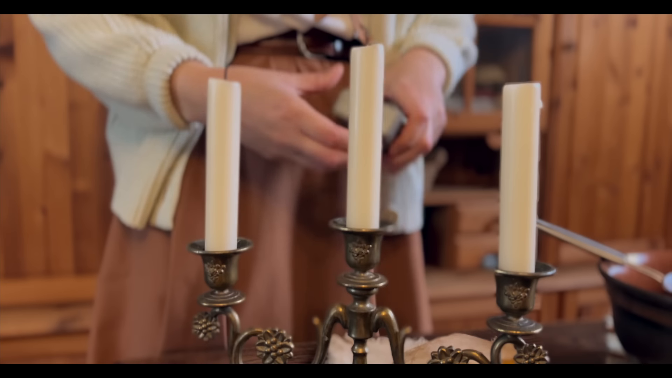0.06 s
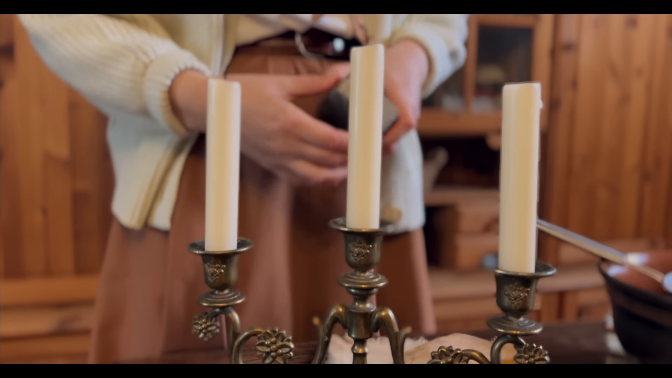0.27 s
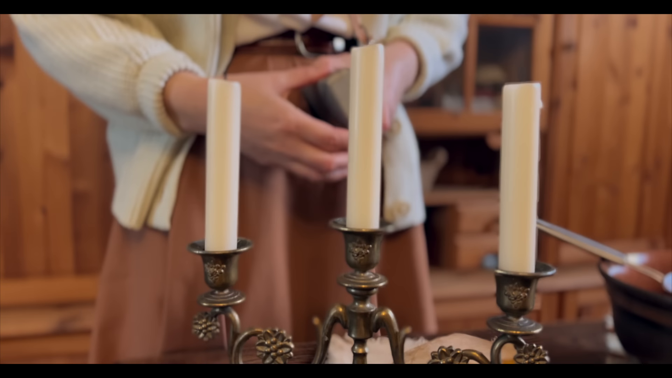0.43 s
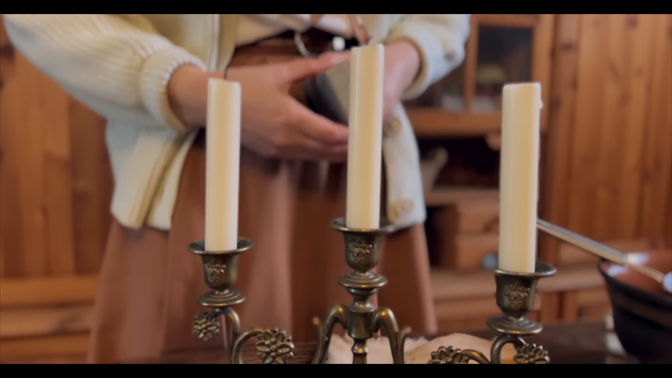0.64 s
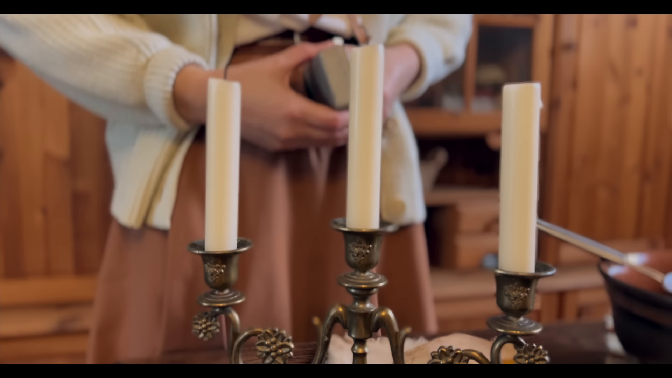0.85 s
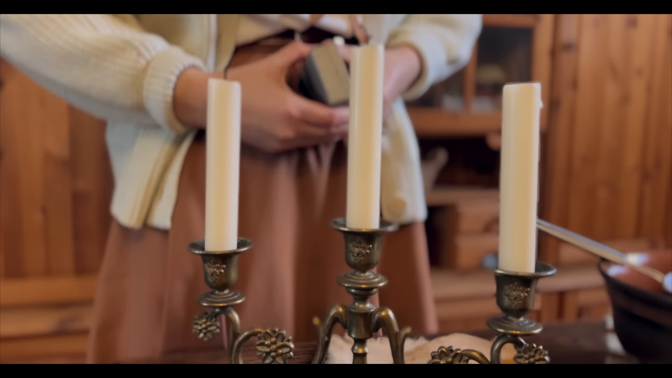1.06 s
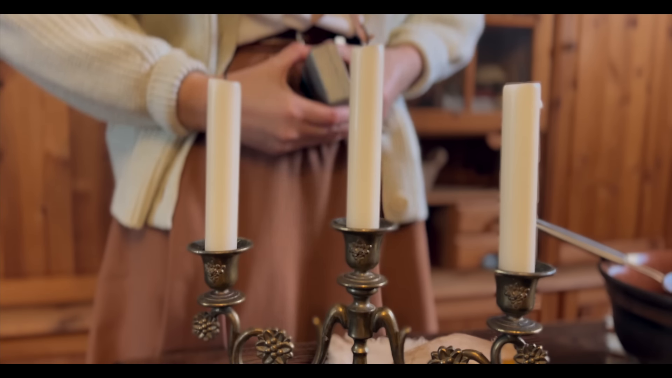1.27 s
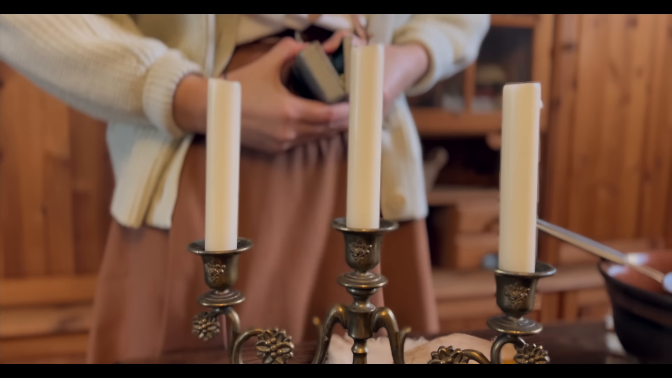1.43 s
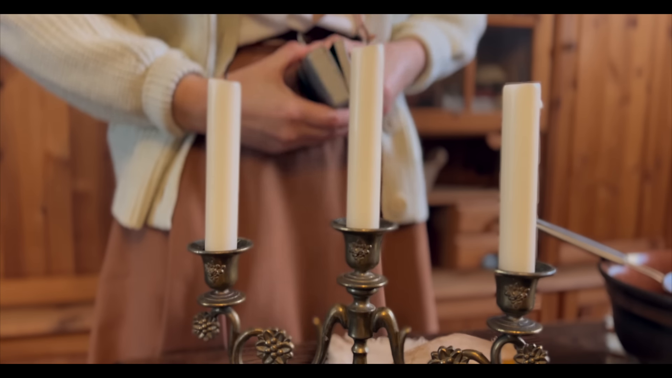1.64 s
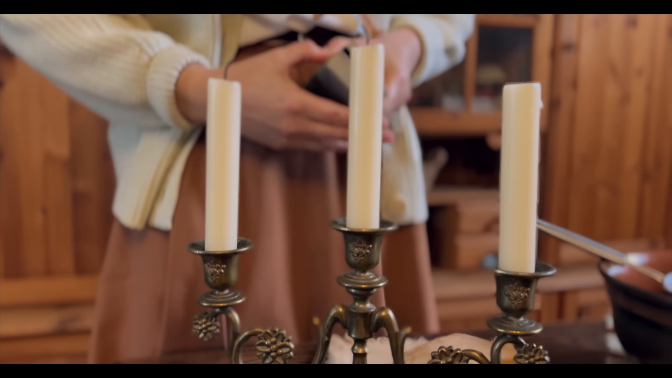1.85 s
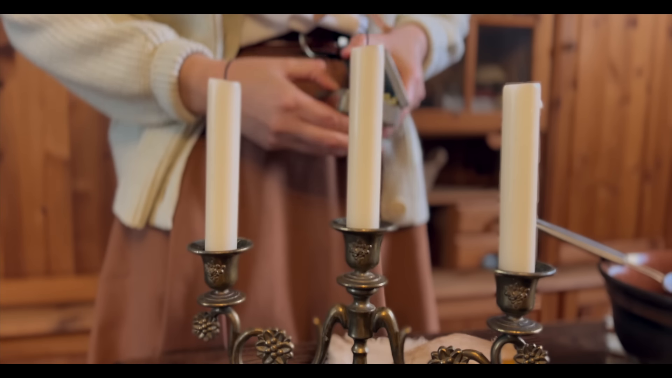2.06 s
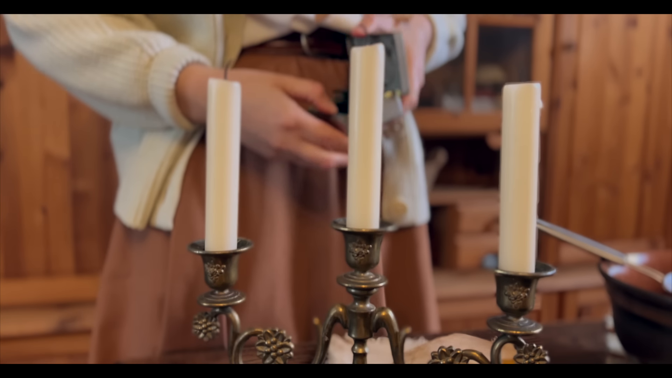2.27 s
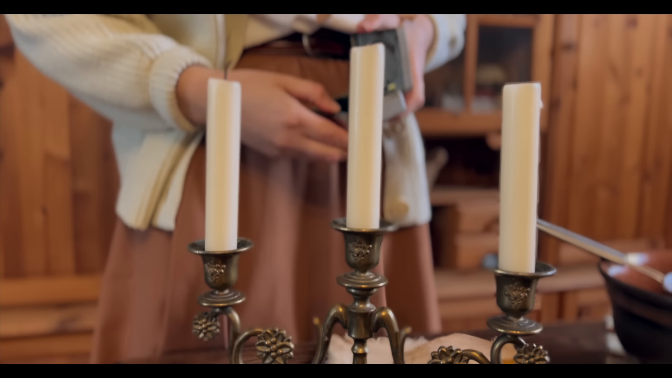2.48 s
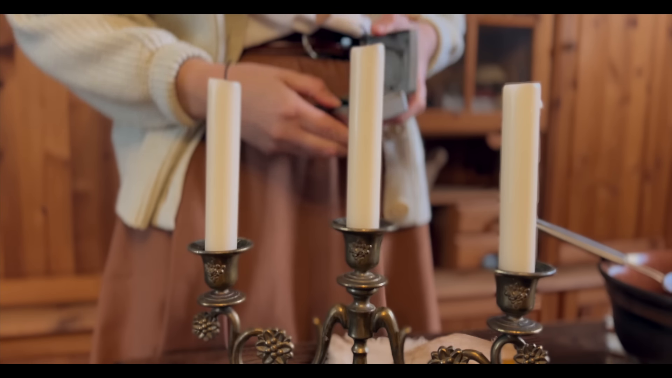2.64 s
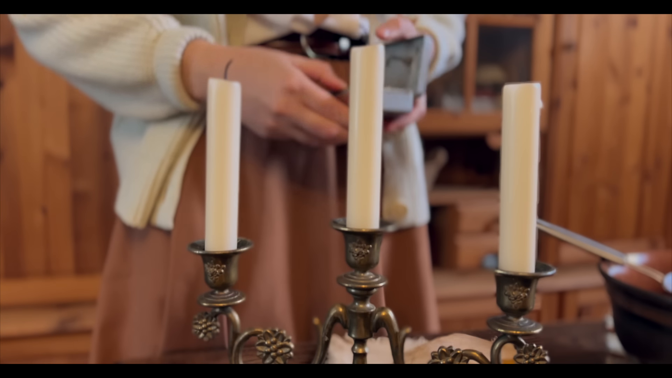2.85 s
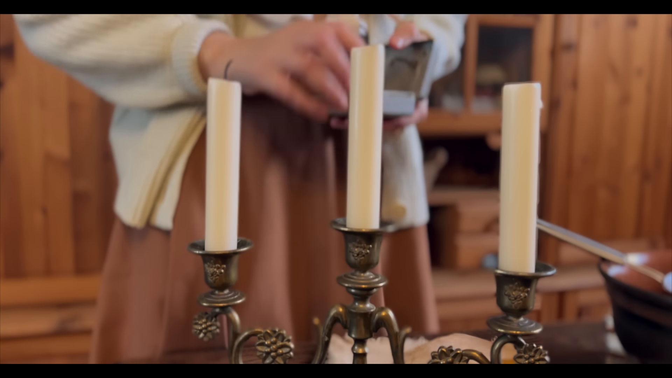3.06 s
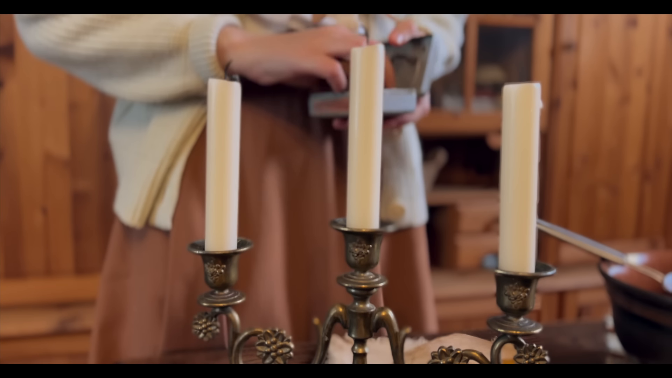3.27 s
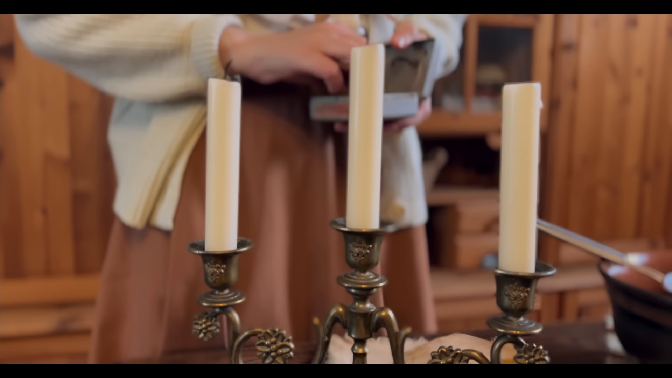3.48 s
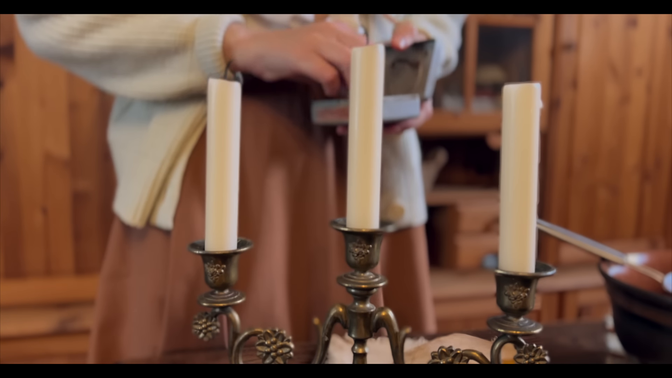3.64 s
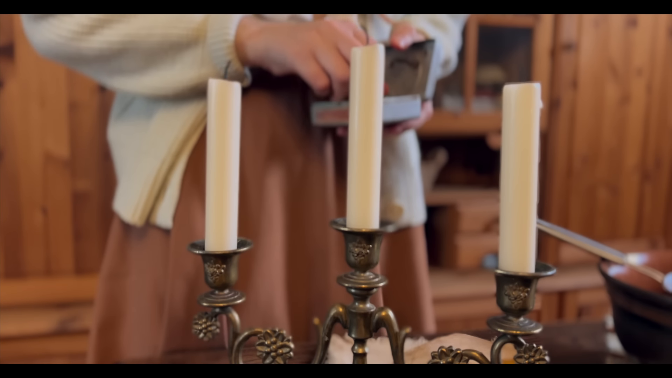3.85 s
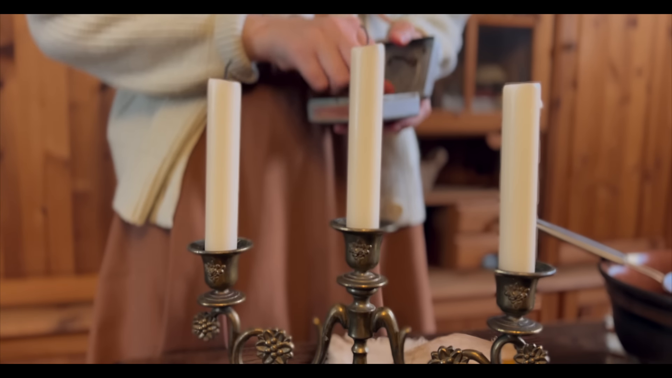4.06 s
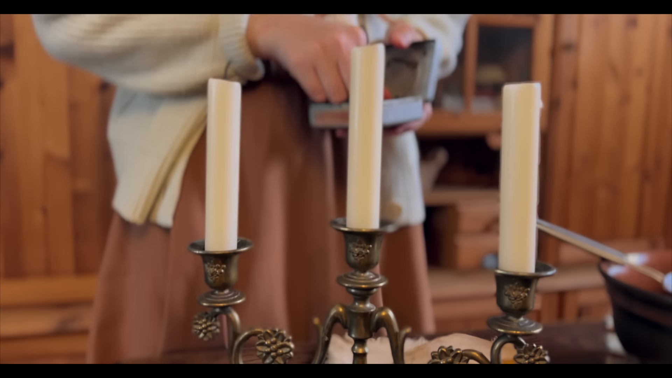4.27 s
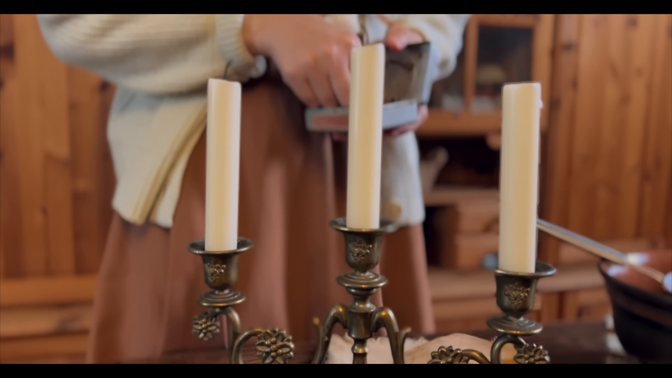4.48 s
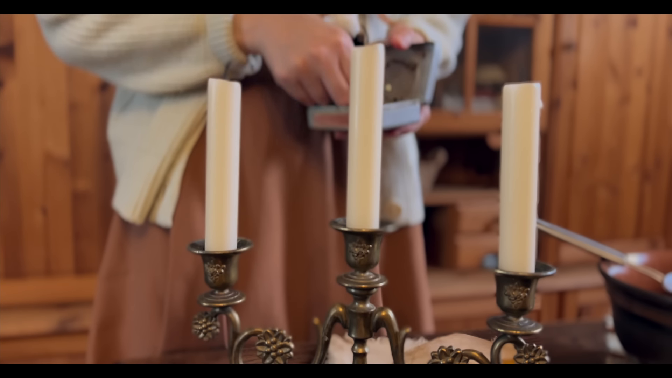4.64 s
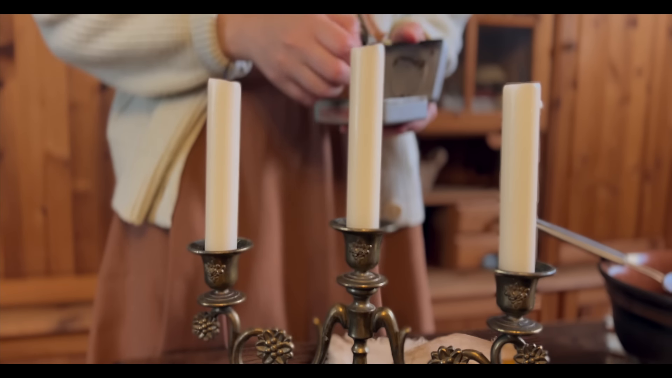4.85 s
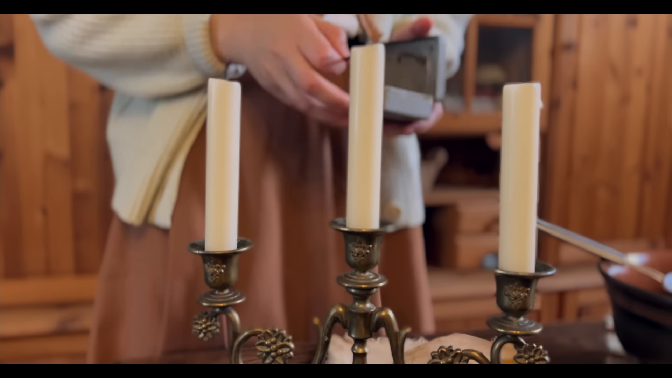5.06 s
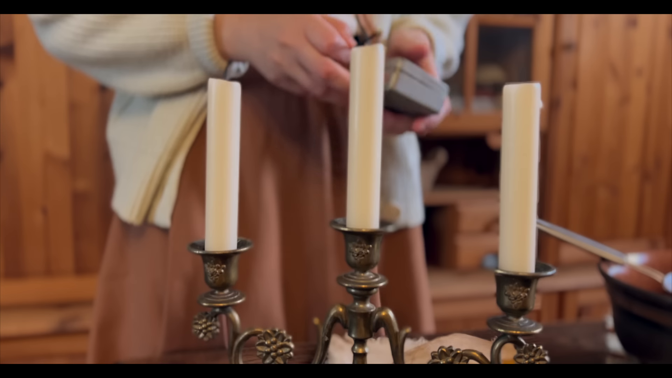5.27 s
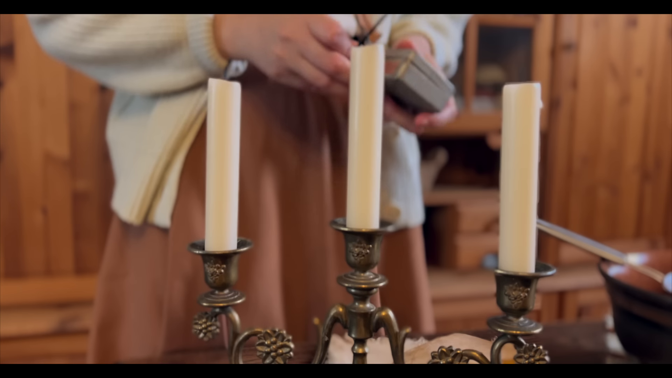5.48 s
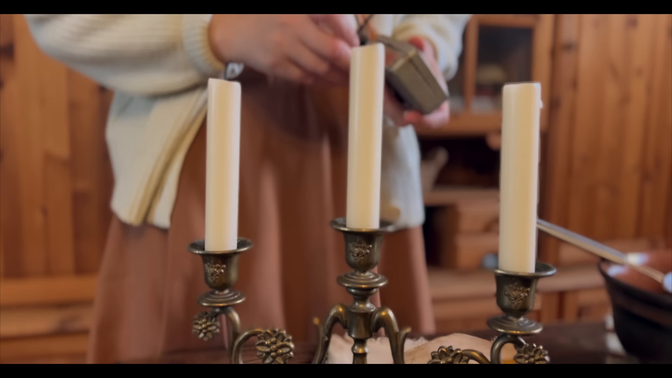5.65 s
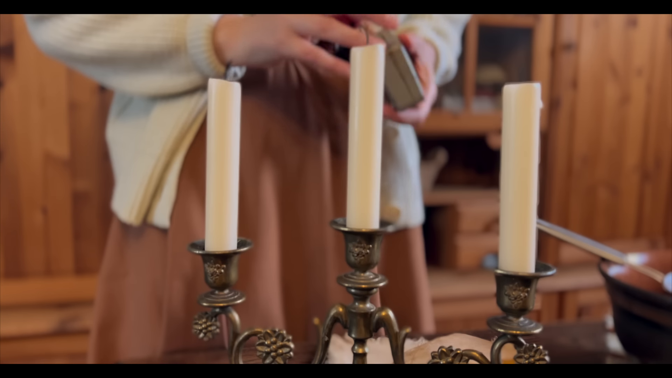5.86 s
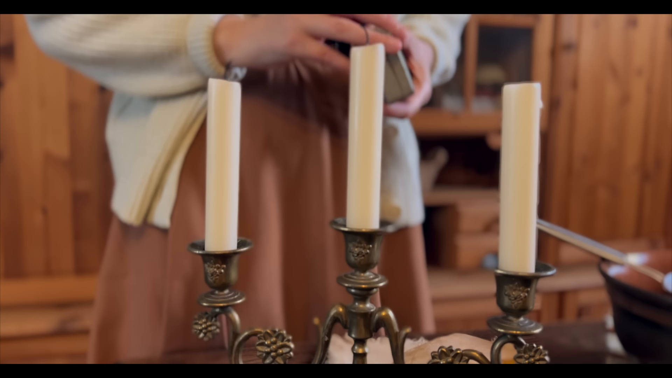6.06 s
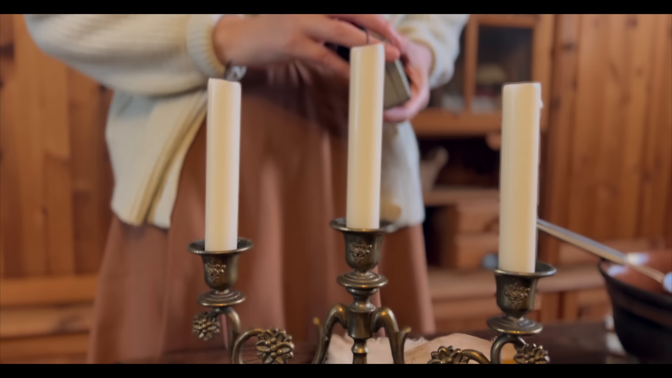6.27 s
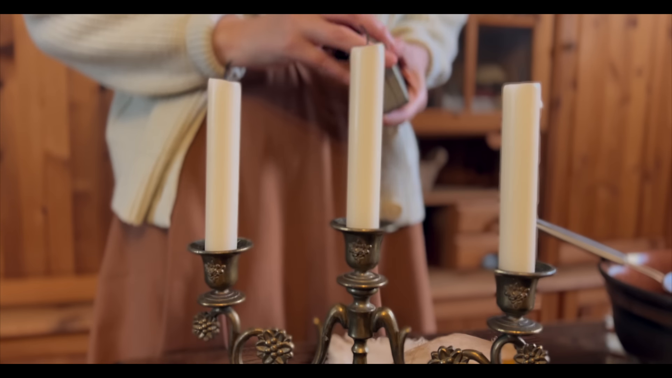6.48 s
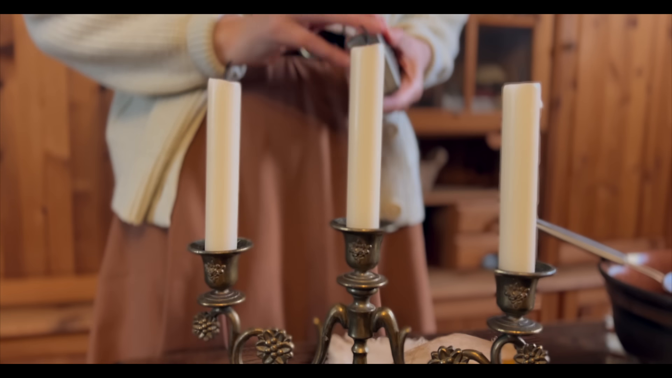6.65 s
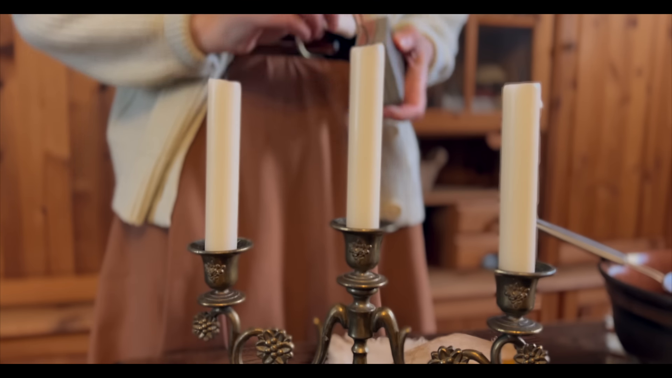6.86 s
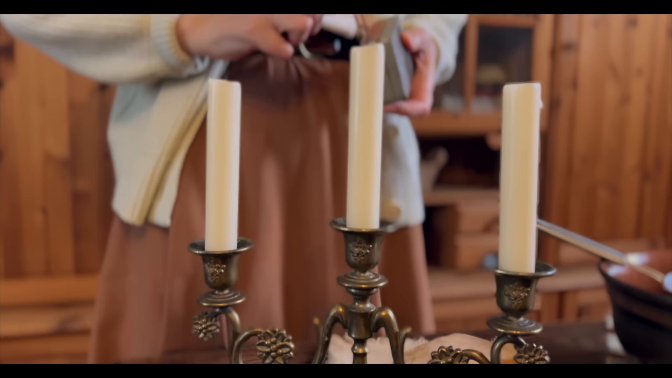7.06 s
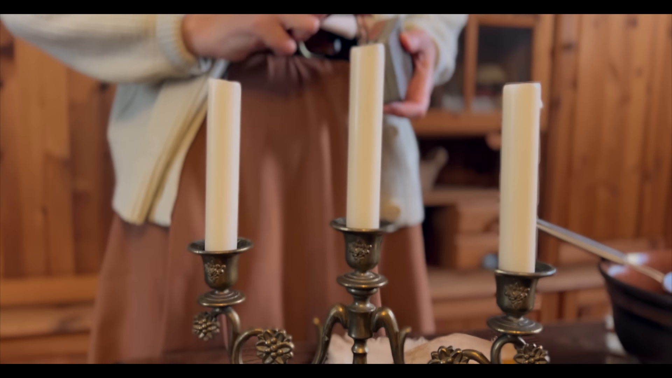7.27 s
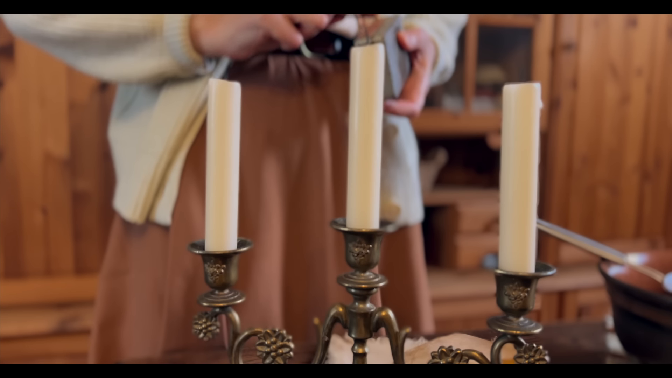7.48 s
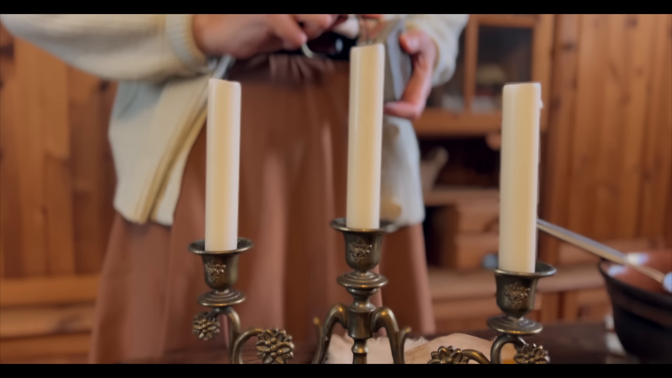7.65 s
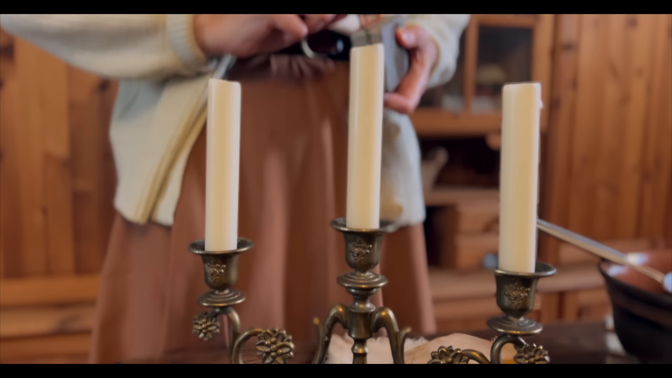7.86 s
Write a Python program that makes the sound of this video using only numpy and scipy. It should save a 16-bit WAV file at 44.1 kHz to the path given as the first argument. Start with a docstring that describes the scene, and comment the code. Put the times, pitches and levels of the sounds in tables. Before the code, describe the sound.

In a quiet room with a faint low hum, a large cardboard matchbox is handled close to a stereo microphone. From 0 to 0.3 s the card rasps and squeaks in short strokes as the matches slide. Faint ticks and dull pushes follow until a loud, hollow thumb knock at 1.3 s, with a brief scrape and ring. Soft touches lead to a bright dry rattle of sticks around 2.3-2.4 s. Fingers then pick among the matches, with a sharper click and scrape at 3.3 s, light rubs near 3.5 and 3.7 s, and isolated clicks at 4.1 and 4.6 s. At 5.26 s the tray clacks sharply with a short squeak, followed by clicks and scuffs to 5.9 s. A harder, fuller clack lands at 6.07 s, its short reverberation fading. Light ticks, rustles and soft bumps dwindle, ending in a small scrape at 7.9 s.

```python
"""Matchbox in the hands

A large cardboard matchbox is handled in a quiet room: the matches slide, a thumb knocks the tray open,
fingers pick among the sticks, and the tray shuts with two sharp clacks. Knocks ring the box modes,
friction is made of tiny random slips, and the hollow of the box sings lower while the tray is out.
Hum, room tone and reverberation surround it; the stereo image widens when the treble rises."""
import sys
import numpy as np
from scipy import signal
from scipy.fft import rfft, irfft, next_fast_len
from scipy.io import wavfile
from scipy.ndimage import uniform_filter1d

SR = 44100
rng = np.random.default_rng(int(sys.argv[2]) if len(sys.argv) > 2 else 0)


def bounce(signal):
    """Save signal as a 16-bit WAV file at the path given by the first command-line argument."""
    frames = np.transpose(np.atleast_2d(signal))
    limited = np.clip(frames, -1, 1)
    pcm = np.round(limited * 32767).astype(np.int16)
    wavfile.write(sys.argv[1], SR, pcm)


N = 349272  # length in samples


def amp(db):
    """Decibels to gain."""
    return 10 ** (np.asarray(db) / 20)


def unit(x):
    """Scales to rms 1."""
    return x / np.sqrt(np.mean(x ** 2) + 1e-20)


def read(points, hz):
    """Reads a table on a log-frequency axis."""
    f, value = np.transpose(points)
    return np.interp(np.log(hz + 1), np.log(f + 1), value)


def add(mix, s, sound):
    """Mixes a sound in at time s."""
    part = mix[max(round(s * SR), 0):][:len(sound)]
    part += sound[:len(part)]


def fade(t, t60):
    """Exponential decay that falls 60 dB in t60 seconds."""
    return np.exp(-np.log(1000) * t / t60)


def colour(x, points):
    """Causal (minimum-phase) filter with the given (Hz, dB) response."""
    size = 2 * next_fast_len(len(x))
    log_gain = np.log(amp(read(points, abs(np.fft.fftfreq(size, 1 / SR)))))
    response = np.exp(np.conj(signal.hilbert(log_gain)))[:size // 2 + 1]
    return irfft(rfft(x, size) * response)[:len(x)]


def resonate(x, hz, width):
    """One resonance of the given centre and width in Hz, with gain 1."""
    pole = np.exp((2j * np.pi * hz - np.pi * width) / SR)
    return (1 - abs(pole)) * signal.lfilter([1, 0, -1], np.poly([pole, np.conj(pole)]).real, x)


def wander(count, per_s):
    """A random curve that takes a new value per_s times a second."""
    steps = np.arange(count) * per_s / SR
    return np.interp(steps, np.arange(1000), rng.standard_normal(1000))


def grains(count, per_s, spread_db, hiss):
    """Friction: tiny slips of uneven size over a smooth hiss."""
    sizes = amp(spread_db * np.minimum(rng.exponential(1, count), 4))
    sizes = sizes * rng.choice([-1, 1], count)
    slips = unit(sizes * (rng.random(count) < per_s / SR))
    return unit(slips + hiss * rng.standard_normal(count))


def sing(slips, hz, width):
    """Slips lock to a resonance, steady or gliding, and even it out into a rough tone."""
    turn = np.exp(2j * np.pi * np.cumsum(hz * np.ones(len(slips))) / SR)
    keep = np.exp(-np.pi * width / SR)
    tone = signal.lfilter([1 - keep], [1, -keep], slips / turn)
    tone = turn * uniform_filter1d(tone, size=64)
    return unit(tone.real / np.sqrt(abs(tone) + 1e-12))  # the root halves the swings in dB


# Modes of the cardboard box. Each row: pitch in Hz, level in dB, t60 in seconds before hand damping.
BOX_MODES = [(274, -3, 0.049), (356, -3.5, 0.034), (561, 0, 0.028), (880, -12.5, 0.015), (1048, -8, 0.056),
             (1144, -7, 0.045), (1282, -2.5, 0.032), (1505, -7, 0.054), (1580, -13.5, 0.04),
             (1912, -5.5, 0.034), (2250, -11, 0.023), (2848, -7.5, 0.05), (2972, 3.5, 0.018),
             (4090, -6, 0.013), (4300, -9, 0.031), (4450, -7.5, 0.03), (5210, -5, 0.03), (5400, -22, 0.04),
             (6860, 0.5, 0.012), (7760, -3.5, 0.03), (7730, -10.5, 0.03)]


def walls(slips, tuning, hand_damping=0.014):
    """The box modes, driven by friction and damped by the hand, the high ones most."""
    out = np.zeros(len(slips))
    for hz, mode_db, t60 in BOX_MODES:
        width = 2.2 / t60 + hand_damping * hz
        out += amp(mode_db) * t60 * resonate(slips, hz * tuning, width)
    return out


def grit(count, per_s=190, spread_db=5, stick_hz=4164, octaves=0.9, stick_t60=0.029):
    """Separate snags, each pinging one matchstick at its own pitch, up to octaves above or below stick_hz."""
    out, t = np.zeros(count), np.arange(1024) / SR
    for when, pitch, size in rng.random((round(per_s * count / SR), 3)):
        hz = min(stick_hz * 2 ** (octaves * (2 * pitch - 1)), SR / 2)
        ping = amp(-60 * t / stick_t60) * np.sin(2 * np.pi * hz * t)
        size_db = spread_db * min(-np.log(1 - size), 3)
        add(out, when * count / SR, amp(size_db) * ping)
    return unit(out)


# Tone of the room air. Each row: frequency in Hz, relative level in dB per Hz.
AIR_TONE = [(15, -48), (25, -29.5), (62, -5.5), (108, -1), (134, 2), (206, -13.5), (263, -5.5), (344, -5),
            (416, -13.5), (734, -13.5), (887, -21), (1480, -20), (2350, -26.5), (7710, -31.5),
            (14800, -40.5), (16000, -46)]


def air(level_db=-62, side_db=-14.5, hum_hz=116.7, hum_db=-68, hum_width=3):
    """Low room tone, nearly mono, with a faint hum of narrow noise that wavers by nature."""
    mid = unit(colour(rng.standard_normal(N), AIR_TONE))
    side = unit(colour(rng.standard_normal(N), AIR_TONE))
    hum = amp(hum_db) * unit(resonate(rng.standard_normal(N), hum_hz, hum_width))
    return amp(level_db) * (mid + amp(side_db) * np.array([side, -side])) + hum


# Tone of rubbing on card, shared by brush and slides. Each row: frequency in Hz, gain in dB.
RUB_TONE = [(200, -32.5), (800, -36.5), (1300, -10.5), (2000, 6.5), (2450, 0), (3000, -1), (3600, 3.5),
            (4400, -3), (6000, 0), (8000, -2.5), (10000, -3), (13000, -2), (16000, -10)]
# Touch of the hands on the box. Each row: time in seconds, touch in dB before contrast and trim.
TOUCH = [(0.0, -59.5), (0.22, -52.5), (0.42, -66.5), (1.01, -72.5), (1.39, -62.5), (1.94, -70), (2.47, -58),
         (2.69, -67), (3.26, -77), (3.46, -57), (3.66, -60.5), (3.84, -72.5), (5.27, -69), (5.38, -62.5),
         (5.95, -61), (6.2, -53.5), (6.48, -68.5), (7.15, -83), (7.92, -71)]


def brush(firm_db=-62, contrast=1.28, trim_db=-6, ring_db=-4, grit_db=-2):
    """A faint, sparse crackle of skin and wool on card, ringing a little in the walls and stirring the matches."""
    slips = grains(N, per_s=900, spread_db=3.5, hiss=0.5)
    skin = unit(colour(slips, RUB_TONE))
    panels = unit(colour(walls(slips, 0.93), RUB_TONE))
    crackle = skin + amp(ring_db) * panels + amp(grit_db) * grit(N, per_s=140)
    touch_db = np.interp(np.arange(N) / SR, *np.transpose(TOUCH)) - firm_db
    # contrast above 1: a light touch rustles much less than a firm one
    return amp(firm_db + contrast * touch_db + trim_db) * unit(crackle)


def shuffle(db=-69, swell_db=4):
    """Small, dull stirrings of the body and clothes, coming and going."""
    pats = grains(N, per_s=160, spread_db=1.1, hiss=0.16)
    pats = pats * amp(swell_db * np.tanh(wander(N, per_s=15)))
    dull = [(60, -12), (130, -7), (330, 0.5), (600, -10), (1300, -17.5), (3000, -44), (8000, -65.5)]
    return amp(db) * unit(colour(pats, dull))


# Rough gliding tones of the box: tray squeaks and the singing of the hollow. Each row: peak in seconds,
# level in dB, pitch at the peak in Hz, time from the peak to 1/e in seconds, glide in Hz per second.
GLIDING_TONES = [(0.064, -63, 1670, 0.041, -400), (0.078, -61, 1900, 0.036, 1500),
                 (0.117, -49, 1796, 0.018, 3000), (0.14, -42, 1950, 0.0092, 2000),
                 (0.228, -57, 1256, 0.027, -900), (0.224, -53, 1650, 0.018, -1500),
                 (0.24, -54.5, 1940, 0.032, -500), (0.323, -66, 1233, 0.056, -200),
                 (1.349, -51.5, 2000, 0.021, -1000), (1.415, -56.5, 1218, 0.054, -300),
                 (1.943, -57.5, 1070, 0.021, -3000), (2.441, -64, 1127, 0.064, -300),
                 (2.66, -70, 1105, 0.047, -300), (3.391, -66, 1096, 0.036, -300),
                 (3.486, -68, 1094, 0.035, -200), (3.472, -67, 2050, 0.049, -300),
                 (3.733, -62, 1400, 0.018, -5), (5.199, -59, 1306, 0.025, 600),
                 (5.2443, -36, 1142, 0.007, -4000), (5.30, -50.5, 925, 0.033, -1800),
                 (5.399, -62, 864, 0.035, -500), (5.463, -55, 1630, 0.013, -3000),
                 (5.781, -52, 1590, 0.0097, -2000), (7.907, -58, 1440, 0.014, -2000)]


def gliding_tones(width_hz=55, octave_db=-19):
    """Tray squeaks and the singing hollow: noise locked to a gliding pitch and its octave swells and fades."""
    out = np.zeros(N)
    t = np.arange(-SR // 18, SR // 12) / SR
    for s, db, hz, half_s, glide in GLIDING_TONES:
        slips, pitch = rng.standard_normal(len(t)), hz + glide * t
        tone = sing(slips, pitch, width_hz)
        tone = tone + amp(octave_db) * sing(slips, 2 * pitch, 2 * width_hz)
        add(out, s + t[0], amp(db) * np.exp(-(t / half_s) ** 2) * tone)
    return out


# Dull pushes of the hands. Each row: start in seconds, level in dB, pitch in Hz, cycles to the peak.
BUMPS = [(0.026, -51, 330, 0.7), (0.029, -52, 109, 0.66), (0.078, -47, 310, 0.74), (0.089, -58, 90.5, 0.63),
         (0.51, -52.5, 110, 1), (0.58, -53, 400, 1.3), (0.77, -51, 134, 1), (1.114, -62, 300, 1.2),
         (1.314, -40, 109, 0.51), (1.3173, -25, 398, 1.3), (1.319, -33.5, 257, 0.88),
         (1.32, -34.5, 570, 1.3), (1.391, -54.5, 144, 1.65), (1.595, -58, 289, 1.3),
         (1.683, -47, 326, 0.98), (1.876, -49, 345, 0.53), (2.07, -59.5, 328, 1.8), (2.63, -57, 292, 1.5),
         (2.769, -64, 116, 0.68), (3.19, -59.5, 280, 2), (3.31, -57, 300, 0.97), (3.89, -55, 334, 1),
         (4.21, -59, 109, 1.1), (4.355, -56, 130, 0.79), (4.365, -61, 420, 1.3), (4.815, -54, 111, 1.3),
         (4.831, -60, 327, 1.8), (5.175, -55.5, 330, 1.3), (5.257, -33.5, 825, 1.2), (5.274, -59, 141, 1.3),
         (5.774, -54, 350, 1.7), (5.789, -52, 121, 0.83), (5.90, -55, 328, 1.6), (6.055, -43.5, 515, 2.6),
         (6.0755, -22, 546, 0.87), (6.076, -34.5, 300, 0.56), (6.124, -54.5, 120, 1.1),
         (6.515, -53.5, 302, 1.05), (6.745, -61, 124, 1), (6.926, -59, 640, 1.3), (7.015, -52.5, 290, 1.4),
         (7.04, -58.5, 120, 1), (7.275, -50, 332, 0.8), (7.664, -48.5, 356, 1), (7.716, -57, 114.4, 1.2)]


def bumps():
    """Dull pushes that flex a panel for a few cycles."""
    out, t = np.zeros(N), np.arange(SR // 8) / SR
    for s, db, hz, cycles in BUMPS:
        u = t * hz / cycles
        swell = u * np.exp(1 - u)  # peaks at 1 after the given cycles
        add(out, s, amp(db) * swell * np.sin(2 * np.pi * (hz * t + rng.random())))
    return out


def part_ring(t, hz, t60=0.047, overtone=1.6, overtone_db=-4):
    """The struck panel or matchstick rings on briefly with two modes."""
    modes = np.sin(2 * np.pi * hz * t) + amp(overtone_db) * np.sin(2 * np.pi * hz * overtone * t)
    return unit(modes * fade(t, t60))


# Tone of the contact noise. Each row: frequency in Hz, gain in dB.
CRACK_TONE = [(100, -34), (700, 0), (1500, -4), (4000, 0), (8000, -2), (10000, -3), (13000, -5.5),
              (16000, -11.5)]
# Large parts carry bass, small ones do not. Each row: pitch of the struck part in Hz, bass gain in dB.
PART_BASS = [(500, 8), (950, 5), (2000, -8), (6000, -13)]
SOFT_TO_HARD_DB = [-42, -13.5]  # knock levels between which attack and ring are graded


def knock(db, bright_db, part_hz, crack_s, crack_db=13, scatter_db=2, rattle_db=-5, rattle_s=0.012,
          part_db=4, part_q=6, treble_share=0.6):
    """A crack, the box modes and a rattle of matches; each knock has its own brightness."""
    t = np.arange(4096) / SR
    hz, mode_db, t60 = np.transpose(BOX_MODES)[:, :, None]
    turn, spot = rng.random(hz.shape), rng.standard_normal(hz.shape)
    damping = np.log(1000) / t60 + .03 * hz  # the gripping hand damps the high modes most
    modes = amp(mode_db + scatter_db * spot) * np.exp(-damping * t) * np.sin(2 * np.pi * (hz * t + turn))
    ring = modes.sum(0)
    crack = unit(colour(rng.standard_normal(len(t)), CRACK_TONE)) * np.exp(-t / crack_s)
    sticks = grains(len(t), per_s=4300, spread_db=3, hiss=1)
    rattle = unit(colour(sticks, CRACK_TONE)) * np.exp(-t / rattle_s)
    # a hard blow bites at once, a light touch more slowly
    attack_s = np.interp(db, SOFT_TO_HARD_DB, [0.0015, 0.0004])
    blow = (ring + amp(crack_db) * crack + amp(rattle_db) * rattle) * (1 - np.exp(-t / attack_s))
    blow = blow + amp(part_db) * resonate(blow, part_hz, part_hz / part_q)  # panel, edge or matchstick
    # the part's own ring is a larger share of a light touch
    ring_db = np.interp(db, SOFT_TO_HARD_DB, [-9.5, -13])
    blow = unit(blow) + amp(ring_db) * part_ring(t, part_hz)
    treble_db = treble_share * bright_db  # brightness reaches partly into the middle treble
    blow = colour(blow, [(560, read(PART_BASS, part_hz)), (1000, 0.0022), (2000, 0.0071),
                         (2900, treble_db), (5000, treble_db), (12000, bright_db)])
    return amp(db) * blow / np.sqrt(np.sum(blow ** 2) / (0.0021 * SR))  # energy as if packed in 2.1 ms


# Knocks on the box and its matches, from faint ticks to the loud thumb knock. Each row: start in seconds,
# level in dB, brightness in dB at 12 kHz and up, pitch of the struck part in Hz,
# fall of the crack to 1/e in seconds.
KNOCKS = [(0.028, -49, -6, 1740, 0.0023), (0.112, -43, 4, 1990, .003), (0.578, -49.5, -9, 700, 0.0034),
          (0.851, -59.5, -1, 3270, 0.0015), (0.973, -57.5, 2, 3330, 0.0015), (0.992, -54, -1, 7200, 0.0014),
          (1.029, -48, -12, 860, 0.0021), (1.056, -56.5, 2, 3840, 0.0017), (1.206, -50, -10, 4700, 0.0015),
          (1.310, -33.5, -38, 1250, 0.0036), (1.3151, -28, -16, 876, .003), (1.3183, -41, -7, 1930, 0.0023),
          (1.320, -31, -23, 604, 0.002), (1.3241, -34, -7, 6800, 0.0016), (1.577, -50.5, 7, 1280, 0.00091),
          (1.864, -52, -7, 4110, 0.0012), (1.944, -49.5, -13, 1075, 0.0025),
          (2.081, -52.5, 4, 1120, 0.0023), (2.192, -57, 6, 6660, 0.0022), (2.233, -52.5, -4, 3550, 0.0022),
          (2.284, -46, 16, 7390, 0.0037), (2.364, -36.5, 23, 6870, 0.0015), (2.377, -34, 17, 4570, .002),
          (2.401, -39, 10, 4300, 0.0017), (2.424, -43, 8, 4300, 0.0024), (2.629, -49, -7, 4020, .003),
          (2.687, -57, -10, 3630, .001), (2.73, -58.5, -10, 3040, 0.00079), (2.836, -47, 6, 13300, 0.0013),
          (2.952, -44.5, 34, 7340, .003), (3.106, -62, -4, 6960, 0.0012), (3.163, -50, -11.5, 3300, 0.0023),
          (3.502, -53, 0, 2420, 0.0018), (3.279, -35, 7, 4300, 0.0025), (3.574, -52, -3, 3520, 0.0034),
          (3.705, -45.5, 19, 1130, 0.002), (3.719, -59, 15, 2040, 0.0038),
          (4.1149, -39, -5.5, 4580, 0.0019), (4.457, -57, -2, 12500, 0.0013),
          (4.632, -45.5, 3, 1970, 0.0025), (4.863, -51, -8, 2640, 0.0027), (5.02, -52.5, -13, 760, 0.0018),
          (5.244, -37.5, -2, 4300, 0.0066), (5.264, -35.5, -19, 5240, 0.0025),
          (5.28, -36.5, 0.5, 5060, .003), (5.316, -43.5, -6.5, 4140, 0.0032), (5.456, -40, 5, 2400, .003),
          (5.585, -50, -16.5, 1910, 0.0043), (5.702, -41, 6, 5380, .0015), (5.773, -38.5, -6, 1700, 0.003),
          (5.887, -39, 1, 2190, 0.0027), (5.966, -48.5, 2.5, 4630, 0.0034), (6.078, -25.5, -11, 2970, .002),
          (6.34, -43, 13, 7320, 0.0015), (6.433, -52.5, 0, 4150, .003), (6.604, -50.5, -5, 1290, 0.0028),
          (6.717, -49, 0, 7680, 0.0012), (6.816, -51, -14, 1076, 0.004), (6.89, -58.5, -9, 2205, .002),
          (6.958, -58, -13, 2850, 0.0046), (7.056, -62.5, 8, 8680, 0.0015), (7.339, -47, -9, 2790, 0.0035),
          (7.519, -56, -7, 3020, .004), (7.582, -66, 11.5, 1610, 0.0012), (7.621, -59, 5, 1210, 0.0011),
          (7.789, -58, 0, 7400, .001)]


def knocks():
    """Thumb, tray and matchsticks strike the box."""
    out = np.zeros(N)
    for s, db, bright_db, part_hz, crack_s in KNOCKS:
        add(out, s, knock(db, bright_db, part_hz, crack_s))
    return out


# Strokes of matches, tray and fingers. Each row: peak in seconds, level in dB before the trim,
# rise from 1/e in seconds, brightness in dB at 12 kHz and up, cavity level in dB against the rasp.
SLIDES = [(0.098, -55, 0.0097, -5, 0), (0.119, -37.5, 0.0058, -2, -7), (0.142, -45.5, 0.0095, 14, -17),
          (0.216, -40.5, 0.019, 5, -5.5), (1.331, -45, 0.0046, 6.5, -1), (1.369, -46.5, 0.013, 1, -22),
          (2.091, -61, 0.014, 7, -14), (2.288, -59, 0.034, 14.5, -14), (2.34, -52, 0.029, 10, -8.5),
          (2.379, -43.5, 0.012, 11.5, -13), (2.407, -44, 0.011, 10, -13), (2.70, -63.5, 0.032, -30, 0.5),
          (2.92, -60.5, 0.021, -3, -9), (2.975, -53.5, 0.033, 1.5, -22), (3.286, -43, 0.0062, 2.5, -1),
          (3.401, -58.5, 0.031, 1.5, -10), (3.463, -54, 0.016, 4, -6.5), (3.505, -56, 0.026, -12, -15),
          (3.711, -47, 0.025, 5, -5.5), (4.12, -53.5, 0.0093, 1, -5), (4.382, -61.5, 0.018, -10, -12),
          (4.637, -50.5, .009, -9, -5), (5.271, -39.5, 0.007, -9, -6), (5.32, -52, 0.017, 6, -22),
          (5.59, -56.5, 0.021, -30, -4), (5.79, -47.5, 0.014, -14, -13), (5.904, -51, 0.025, -1, -19),
          (5.965, -58, 0.0088, 0, -15), (6.743, -63, 0.015, 9, -10), (6.819, -66, 0.0056, -5, -8),
          (7.806, -64.5, 0.02, -14, -5), (7.902, -49.5, 0.0075, -1, -9)]
# How far the tray is out. Each row: time in seconds, share from 0 to 1.
TRAY = [(0.15, 0), (0.22, 0.26), (1.3, 0), (1.9, 0.98), (5.3, 0.97), (5.7, 0.15)]
# Resonances of the hollow. Each row: multiple of the lowest pitch, level in dB.
HOLLOW = [(1, -2), (1.78, -11), (2.62, -15), (3.95, -12)]
SHUT_HZ, OPEN_HZ = 1962, 1101  # lowest pitch of the hollow with the tray fully in and fully out


def slides(fall_s=0.022, cavity_width=30, trim_db=-1, ring_db=-5, catch_db=5.5, grit_db=-4, grip_shift=0.025):
    """Wood and card catch and slip in short strokes; the walls and the hollow of the box sing along."""
    out = np.zeros(N)
    for s, db, rise, bright_db, cavity_db in SLIDES:
        t = np.arange(-min(4 * rise, s), 6 * fall_s, 1 / SR)
        slips = grains(len(t), per_s=1800, spread_db=4, hiss=.4)
        slips = slips * amp(catch_db * np.tanh(wander(len(t), per_s=220)))
        panels = walls(slips, 1 + grip_shift * rng.uniform(-1, 1))  # each new grip retunes the card a little
        rasp = unit(colour(slips, RUB_TONE)) + amp(ring_db) * unit(colour(panels, RUB_TONE))
        rasp = unit(rasp + amp(grit_db) * grit(len(t)))
        rasp = colour(rasp, [(6000, 0.004), (12000, bright_db)])
        tray_out = np.interp(s, *np.transpose(TRAY))
        cavity_hz = SHUT_HZ + (OPEN_HZ - SHUT_HZ) * tray_out
        hollow = sum(amp(mode_db) * sing(slips, multiple * cavity_hz, cavity_width)
                     for multiple, mode_db in HOLLOW)
        pressure = np.exp(np.minimum(t / rise, -t / fall_s))  # own rise, then a shared fall
        add(out, s + t[0], amp(db + trim_db) * pressure * (rasp + amp(cavity_db) * hollow))
    return out


# Narrow tones that hang in the room after the three loud blows.
# Each row: start in seconds, pitch in Hz, level in dB, t60 in seconds.
AFTERTONES = [(1.324, 370.5, -41, .42), (1.325, 590, -47, 0.36), (1.325, 793, -49, 0.55),
              (1.325, 915, -47, 0.4), (1.325, 1010, -40.5, 0.31), (1.325, 1911, -48, 0.24),
              (5.262, 1720, -48, 0.38), (5.262, 4330, -41, 0.41), (6.076, 548, -44.5, 0.38),
              (6.076, 680, -36, 0.4), (6.076, 1544, -42.5, 0.46), (6.076, 2977, -47, 0.55),
              (6.075, 3900, -42, 0.44)]


def aftertones(build_s=0.008, apart=1.2):
    """A few pitches outlast each loud blow and reach the two sides out of step (apart, in radians)."""
    out, t = np.zeros((2, N)), np.arange(SR // 2) / SR
    for s, hz, db, t60 in AFTERTONES:
        level = amp(db) * (1 - np.exp(-t / build_s)) * fade(t, t60)
        phase = 2 * np.pi * (hz * t + rng.random())
        add(out[0], s, level * np.sin(phase))
        add(out[1], s, level * np.sin(phase - apart))
    return out


def struck(modes, t, rise_cycles=0.7):
    """Modes set ringing by one blow; the low ones take longer to swell."""
    hz, mode_db, t60 = np.transpose(modes)[:, :, None]
    swell = 1 - np.exp(-t * hz / rise_cycles)
    tones = np.sin(2 * np.pi * (hz * t + rng.random(hz.shape)))
    return (amp(mode_db) * swell * fade(t, t60) * tones).sum(0)


# The two hard clacks of the tray. Each row: start in seconds, crack level in dB, treble in dB,
# ring of the open tray in dB, ring of the closed sleeve in dB.
CLACKS = [(5.2583, -14, -7, -24, -64), (6.0725, -8, -2.5, -63, -17)]
# Modes of the drawn-out tray. Each row: pitch in Hz, level in dB, t60 in seconds.
OPEN_TRAY = [(580, -9, 0.026), (1102, -0.5, .04), (1730, -7, 0.045), (2770, -5.5, 0.06), (3026, -3.5, .04),
             (3870, -1.5, 0.018), (4930, -9, .025), (5347, -13, 0.065)]
# Modes of the closed sleeve. Each row: pitch in Hz, level in dB, t60 in seconds.
SLEEVE = [(409, -6.5, .04), (1152, -7.5, 0.037), (1256, -12.5, .04), (1551, -8, 0.069), (2880, 0.5, 0.033),
          (3120, -6.5, .03), (3850, -10, 0.055), (4203, -8, .03), (7370, -9.5, 0.027), (7920, -13, 0.058)]


def clacks(bite_s=0.00026, crack_s=0.0018, rattle_db=-24, rattle_s=0.012):
    """The tray hits home: a very short crack, the ring of the card and a shiver of matches."""
    out, t = np.zeros(N), np.arange(4096) / SR
    for s, db, treble_db, tray_db, sleeve_db in CLACKS:
        shape = (1 - np.exp(-t / bite_s)) * np.exp(-t / crack_s)
        shape = shape + amp(rattle_db) * np.exp(-t / rattle_s)
        tone = [(40, -21), (150, -8), (450, -3.5), (900, -4.5), (1400, 2), (5400, 0.5),
                (6500, treble_db), (13000, treble_db), (16000, treble_db - 8.5)]
        crack = colour(shape * rng.standard_normal(len(t)), tone)
        card = amp(tray_db) * struck(OPEN_TRAY, t) + amp(sleeve_db) * struck(SLEEVE, t)
        add(out, s, amp(db) * crack + card)
    return out


# Decay of the room. Each row: frequency in Hz, t60 in seconds.
ROOM_T60 = [(200, 0.74), (530, 0.64), (1390, 0.55), (3680, 0.61), (9700, 0.39)]
# Strength of the tail before build-up and echo. Each row: frequency in Hz, dB against the direct sound.
ROOM_DB = [(100, -1.5), (450, -8), (800, -1), (1500, -3.5), (2100, -5), (2900, -8.5), (4200, -2.5),
           (5500, -1.5), (8000, -4), (13000, -5), (16000, -28.5)]
# Likeness of the two sides. Each row: frequency in Hz, left-right likeness (1 is identical).
ROOM_SAME = [(150, 0.38), (300, 0.97), (650, .1), (1400, 0.37), (6500, 0.39), (8800, 0.81), (9400, 0.99),
             (16000, 0.44)]
# Lean of the tail. Each row: frequency in Hz, left minus right in dB.
ROOM_LEAN = [(100, 1), (400, 0), (2400, 1.5), (5300, 8), (8000, 3.5), (9400, -1), (16000, 0.5)]


def room(x, build_s=0.003, echo_s=0.0788, echo_width_s=0.007, echo_db=4):
    """A dense noise tail, its decay set by frequency, with a soft return from the far wall."""
    hz, t, (a, b) = signal.stft(rng.standard_normal((2, SR)), SR, nperseg=256)
    same = np.clip(read(ROOM_SAME, hz), -1, 1)[:, None]
    lean = amp(read(ROOM_LEAN, hz) / 2)[:, None]
    z = np.array([a * lean, (same * a + np.sqrt(1 - same ** 2) * b) / lean])
    rate = np.log(1000) / read(ROOM_T60, hz)[:, None]
    # the root makes the energy of a band independent of its decay
    z *= amp(read(ROOM_DB, hz))[:, None] * np.sqrt(2 * rate / SR) * np.exp(-rate * t)
    tail = signal.istft(z, SR)[1]
    t = np.arange(tail.shape[1]) / SR
    tail *= 1 - np.exp(-(t / build_s) ** 2)
    tail *= amp(echo_db * np.exp(-((t - echo_s) / echo_width_s) ** 2))
    return signal.fftconvolve(x[None], tail, axes=1)[:, :N]


# A small box radiates little deep bass. Each row: frequency in Hz, gain in dB.
BOX_TONE = [(20, -29.5), (60, -1.5), (130, 6), (1000, 1.5)]


def scene(air_lean_db=1.5):
    """The box in the hands, the room's answer and the room tone, which leans left."""
    box = brush() + shuffle() + gliding_tones() + bumps() + knocks() + slides() + clacks()
    box = colour(box, BOX_TONE)
    lean = amp([[air_lean_db / 2], [-air_lean_db / 2]])
    return box + room(box) + aftertones() + air() * lean


# Phase between left and right at full width. Each row: frequency in Hz, lead of the left in radians.
LEFT_LEAD = [(0, 0), (1700, .1), (3000, 1), (4200, 1), (5500, -.3), (7500, -.5), (8700, -1.2), (9400, -3),
             (10700, -3.3), (12500, -6.2), (14800, -6.4), (16000, -9)]


def record(dry, open_db=-66, range_db=4, follow_s=0.023, edge_hz=16100):
    """Stereo widening that follows the treble power of the left channel; then a low-pass."""
    hz, t, z = signal.stft(dry, SR, nperseg=512, noverlap=384)
    keep = np.exp(-t[1] / follow_s)
    treble = (abs(z[0, hz > 2000]) ** 2).sum(0)
    power = signal.lfilter([1 - keep], [1, -keep], treble)
    width = np.clip((10 * np.log10(power + 1e-14) - open_db) / range_db, 0, 1)
    lead = np.angle(np.exp(1j * read(LEFT_LEAD, hz)))  # wrapped to one turn
    z[1] *= np.exp(-1j * lead[:, None] * width)
    wide = signal.istft(z, SR, nperseg=512, noverlap=384)[1][:, :N]
    low_pass = signal.firwin(401, edge_hz, window=("kaiser", 9), fs=SR)
    return signal.oaconvolve(wide, low_pass[None], "same")


dry = scene()
out = record(dry)
bounce(out)
```